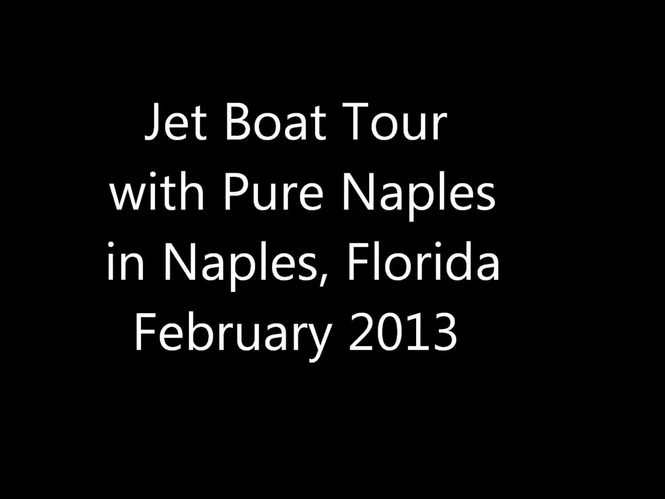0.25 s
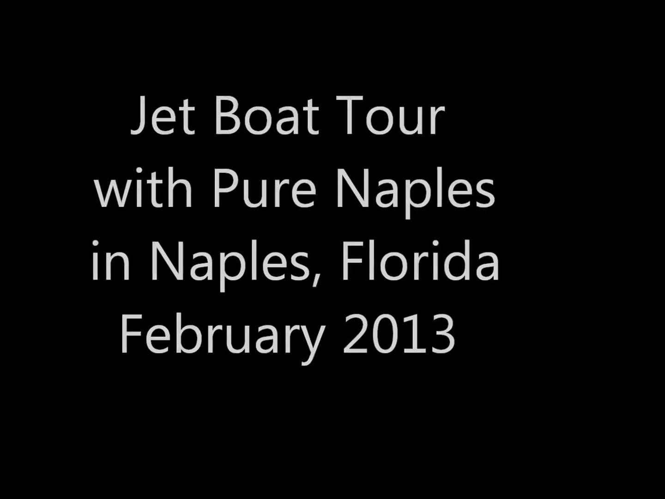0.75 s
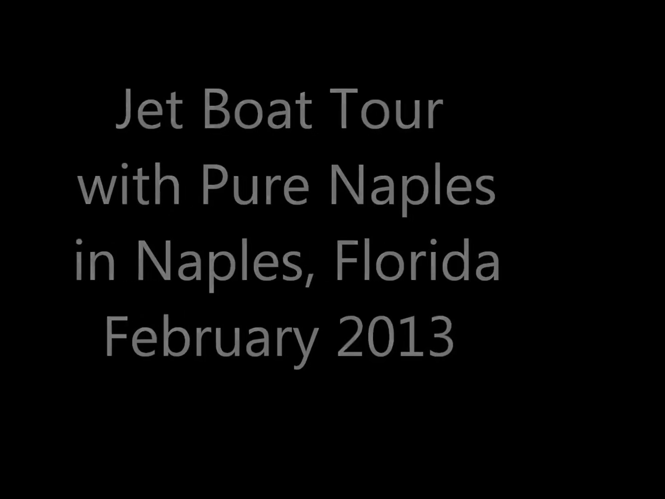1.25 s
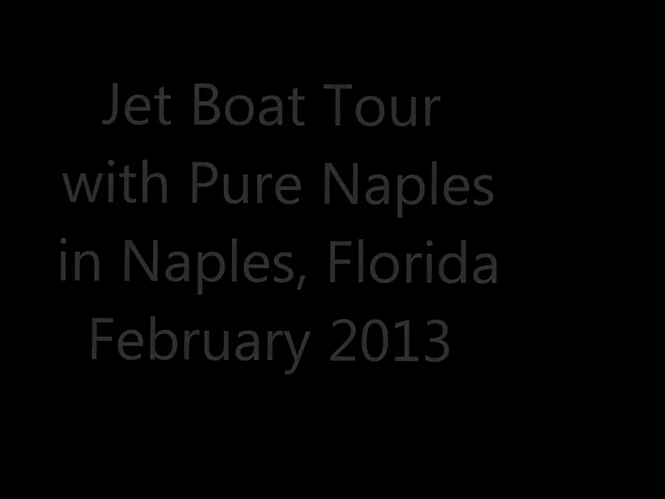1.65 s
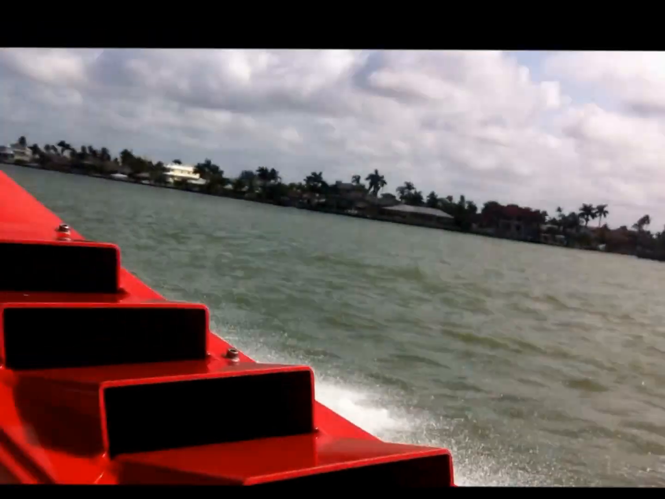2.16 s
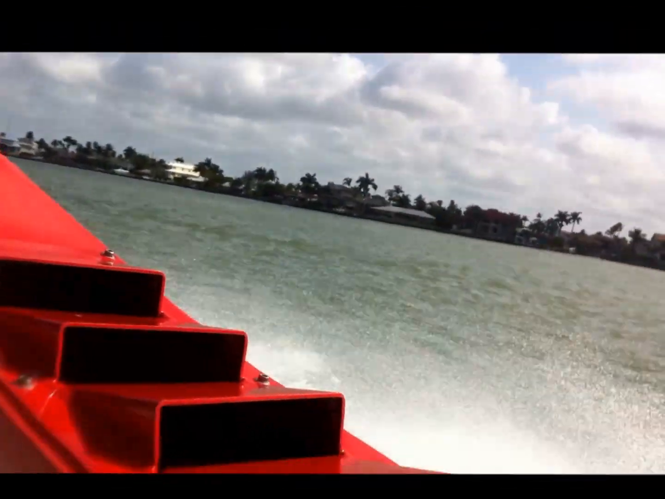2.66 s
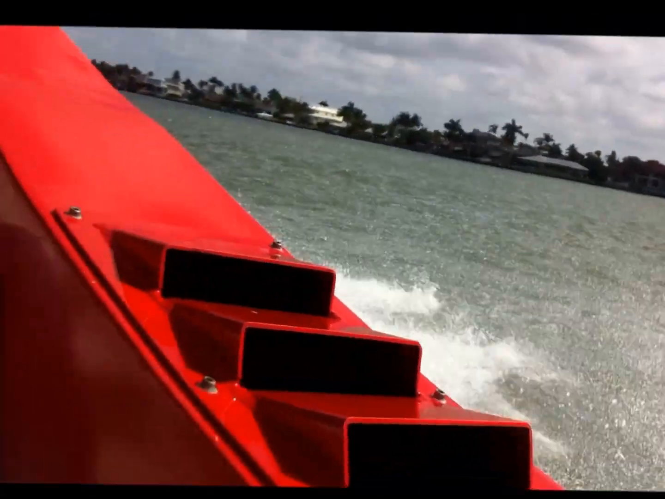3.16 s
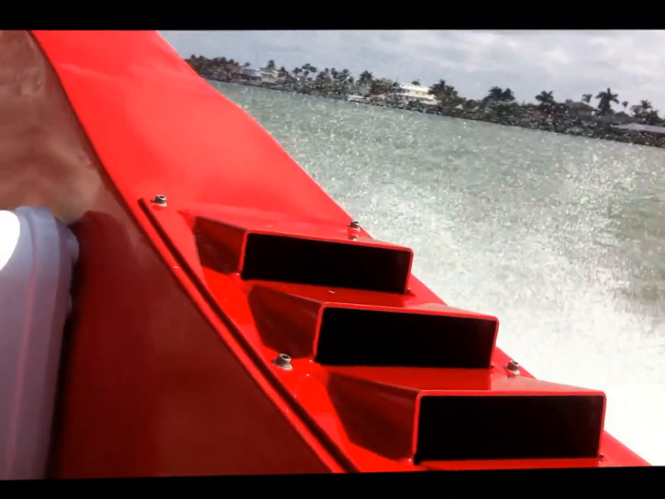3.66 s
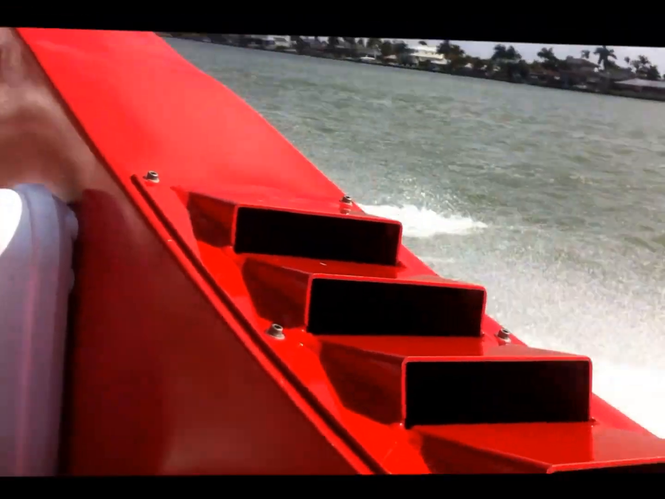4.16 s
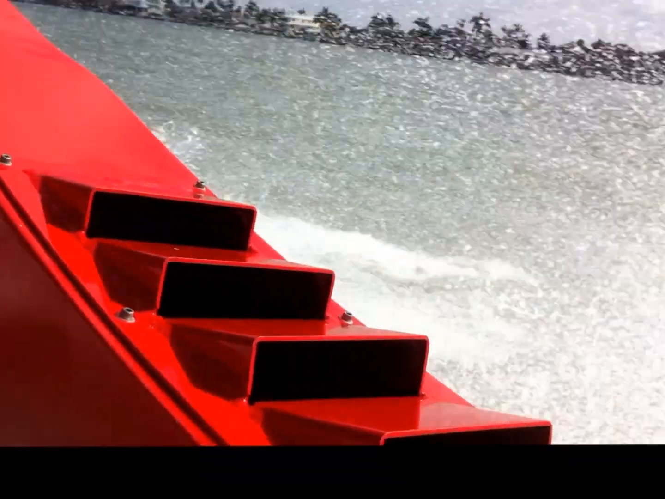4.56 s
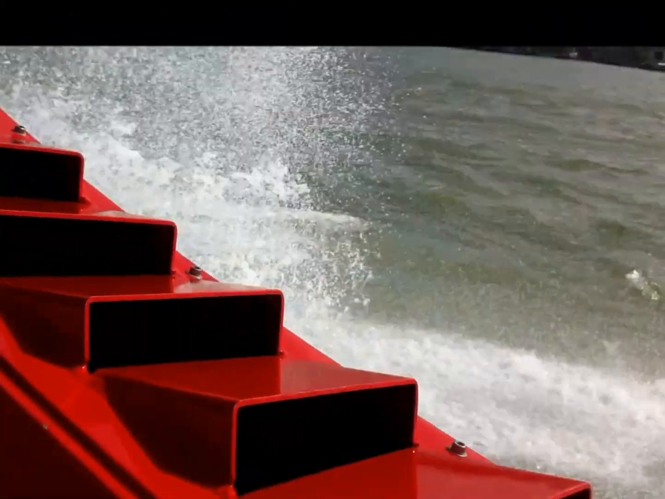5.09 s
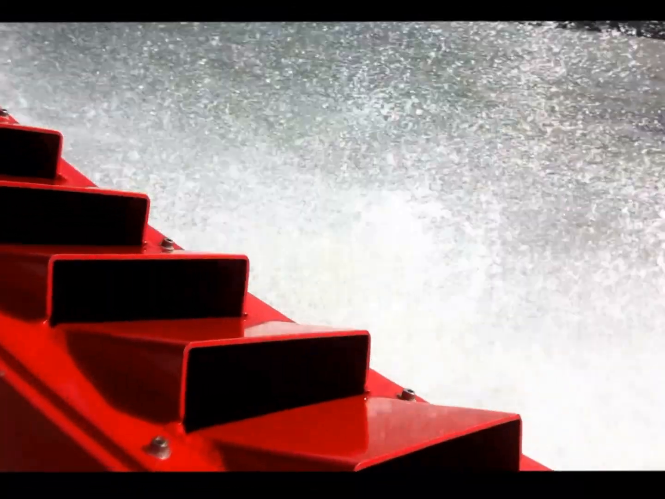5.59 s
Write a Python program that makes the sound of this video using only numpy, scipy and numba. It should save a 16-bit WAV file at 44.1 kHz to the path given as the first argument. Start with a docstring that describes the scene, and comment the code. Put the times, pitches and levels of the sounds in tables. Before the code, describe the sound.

On board a speeding boat over open water, close and dry, the microphone is exposed to the wind. After initial silence, low rumble and ragged gusts dominate, with irregular distorted thumps throughout. Beneath them a tonal engine dips and pulls up again, with buzzing panels and a faint high turbo whistle. Hull water hisses, swells and falls back; the wind ends strongest.

```python
"""On board a jet boat at speed; the sound cuts in after a short silence.
The engine, a harmonic series of exhaust tones over humming panels, eases off and pulls up again.
A turbo whistles thinly as a gliding sine; water rushes along the hull as coloured noise.
Wind roars as patchy noise and thumps on the microphone as filtered impulses; spray drops tick on
it as short noise bursts. A limiter ducks after the hardest peaks."""
import sys
import numpy as np
from scipy import signal
from scipy.fft import rfft, irfft, next_fast_len
from scipy.io import wavfile
from scipy.ndimage import uniform_filter1d
from numba import njit

SR = 44100
rng = np.random.default_rng(int(sys.argv[2]) if len(sys.argv) > 2 else 0)


def bounce(signal):
    """Save signal as a 16-bit WAV file at the path given by the first command-line argument."""
    frames = np.transpose(np.atleast_2d(signal))
    limited = np.clip(frames, -1, 1)
    pcm = np.round(limited * 32767).astype(np.int16)
    wavfile.write(sys.argv[1], SR, pcm)


N = 257103


def undb(db):
    """Decibel law: 20 dB is a factor of ten in amplitude."""
    return 10 ** (np.asarray(db) / 20)


def curves(table):
    """Linear interpolation: each column of a timed table becomes a curve, sample by sample."""
    s, *columns = np.transpose(table)
    return [np.interp(np.arange(N) / SR, s, column) for column in columns]


def unit(x):
    """Normalisation: scale to a standard deviation of 1."""
    return x / np.std(x)


def walk(rate):
    """Band-limited randomness: held random steps, smoothed into a drift with spread 1."""
    hold = max(int(SR / rate), 1)
    steps = np.repeat(rng.standard_normal(N // hold + 1), hold)
    return unit(uniform_filter1d(steps, hold)[:N])


def colour(x, points):
    """Minimum-phase filtering: a causal filter follows a spectrum of (frequency [Hz], gain [dB])."""
    hz, db = np.transpose(points)
    size = next_fast_len(2 * N)
    size += size % 2
    f = np.maximum(np.arange(size // 2 + 1) * SR / size, 1)
    gain_db = np.interp(np.log(f), np.log(hz), db)
    # folding the cepstrum onto positive times makes the filter causal
    cepstrum = irfft(np.log(undb(gain_db)))
    cepstrum[1:size // 2] *= 2
    cepstrum[size // 2 + 1:] = 0
    response = np.exp(rfft(cepstrum))
    return irfft(rfft(x, size) * response)[:N]


def turbulence(points, rate, patchy_db):
    """Intermittency of turbulence: coloured noise arrives in uneven packets; rms 1."""
    packets = undb(patchy_db * walk(rate))
    return unit(colour(rng.standard_normal(N) * packets, points))


def strikes(times, sizes, points):
    """Impulse response: each sudden push sounds the filter's colour; size 1 peaks at 1."""
    pushes = np.zeros(N)
    places = np.clip((times * SR).astype(int), 0, N - 1)
    np.add.at(pushes, places, sizes)
    peak = np.abs(colour(signal.unit_impulse(N), points)).max()
    return colour(pushes, points) / peak


def scatter(rate, spread_db, points, count=2500):
    """Poisson process: pushes at random moments, most small and a few large; rms 1."""
    chance = rng.random((count, 3))
    times = np.cumsum(-np.log(1 - chance[:, 0])) / rate
    sizes_db = -spread_db * np.log(1 - .95 * chance[:, 1])
    signs = np.sign(chance[:, 2] - .5)
    inside = times < N / SR
    return unit(strikes(times[inside], (undb(sizes_db) * signs)[inside], points))


# engine speed and loudness: (time [s], firing rate [Hz], level [dB])
ENGINE_RUN = [(.6, 316, -19), (.95, 306.5, -19), (1.65, 303, -21), (2.1, 313, -22), (2.6, 317, -28),
              (4, 332, -27), (4.6, 337, -19.5), (5.4, 341, -18.5), (5.83, 347, -23)]
# exhaust tones, four firings a turn: (multiple of the crank rate, relative level [dB])
EXHAUST_ORDERS = [(2, -30), (2.5, -21), (3, -18), (3.5, -11), (4, 5.5), (5, -5.5), (6, -21), (7, -10),
                  (9, -18)]
# hull panels that hum for a while:
# (resonance [Hz], width of one filter pass [Hz], level [dB], start [s], end [s])
HULL_PANELS = [(185, 45, -20, 3.2, 4.5), (405, 60, -22, .5, 3.2), (505, 70, -22.5, .5, 3.2),
               (740, 90, -27, 3.2, 6), (1070, 130, -34, .5, 3.3), (1620, 180, -43, 2.3, 3.1),
               (2100, 130, -42, 2.4, 5.1), (2660, 130, -44, .9, 1.9), (3350, 240, -49, 2.2, 3.8)]


def engine():
    """Harmonic series and resonance: tones on the crank's multiples; the firings set hull panels humming."""
    firing_hz, level_db = curves(ENGINE_RUN)
    unsteady_hz = firing_hz * (1 + .002 * walk(30))
    phase = 2 * np.pi * np.cumsum(unsteady_hz) / SR
    crank = phase / 4
    tones = 0
    for order, order_db in EXHAUST_ORDERS:
        gain = undb(order_db + 1.53 * walk(15))
        tones = tones + gain * np.sin(order * crank + 2 * np.pi * rng.random())
    # noise pulsing at the firing rate drives the panels
    puffs = rng.standard_normal(N) * (1 + .5 * np.cos(phase))
    panels = 0
    for hz, width, panel_db, start, end in HULL_PANELS:
        b, a = signal.iirpeak(hz, hz / width, fs=SR)
        once = signal.lfilter(b, a, puffs)
        ring = unit(signal.lfilter(b, a, once))
        fade_db, = curves([(start - .3, -10), (start + .1, 0), (end - .1, 0), (end + .3, -10)])
        panels = panels + ring * undb(panel_db + fade_db)
    return undb(level_db) * unit(tones) + panels


# the turbo spins down and up again after the engine: (time [s], whistle [Hz], level [dB])
TURBO_RUN = [(.65, 8580, -49), (.85, 8300, -63), (1.08, 8070, -64), (1.25, 7950, -72), (2, 7900, -72),
             (2.3, 8110, -57), (3.1, 8590, -50), (4.4, 9130, -55), (5.83, 9710, -54)]


def turbo():
    """Frequency and amplitude modulation: a thin whistle flutters as the wind tears at it."""
    whistle_hz, level_db = curves(TURBO_RUN)
    unsteady_hz = whistle_hz * (1 + .0045 * walk(400))
    phase = 2 * np.pi * np.cumsum(unsteady_hz) / SR
    flutter = undb(3.5 * walk(45) + 2.5 * walk(9))
    return undb(level_db) * unit(np.sin(phase) * flutter)


# eddies bursting on the microphone, each with a sharp click of the overloaded microphone:
# (time [s], thump [dB], click [dB])
BURSTS = [(0.7982, -3, -8), (0.8585, -2.5, -11), (0.894, 0.5, -12), (0.8976, -3, -6), (1.0803, -4.5, -22),
          (1.1228, 0, -19), (1.1741, -1.5, -23), (1.1974, -3.5, -22), (1.2166, -4.5, -12),
          (1.2808, -3.5, -3.5), (1.4139, 0, -4.5), (1.5354, -1.5, -15), (1.5736, -6, -24), (1.669, -4, -11),
          (1.7496, 2, -6.5), (1.8699, -0.5, -3.5), (2.0047, -1, -13), (2.0758, -1.5, -12),
          (2.1078, 0.5, -9), (2.1298, -2, -14), (2.139, -1.5, -8), (2.2032, -1.5, -13), (2.248, -1, -8),
          (2.492, -1.5, -19), (2.53, 1, -12), (2.6425, 1, -17), (2.9153, 1, -18), (3.0469, 0.5, -18),
          (3.2331, 4, -11), (3.479, -1, -17), (3.5398, -1.5, -17), (3.5717, 3, -7), (3.692, 0.5, -17),
          (3.8183, 0.5, -15), (4.0277, -0.5, -10.5), (4.1233, -3, -20), (4.157, 0, -5), (4.2196, 1.5, -12),
          (4.337, 1.5, -2), (4.3582, 0, -2.5), (4.3695, -1, -10), (4.5407, 0, -17), (4.6317, 1.5, -2),
          (4.6596, -4, -4), (4.8623, -3, -16), (4.9587, -1.5, -2), (5.056, -0.5, -19), (5.116, -1, -10),
          (5.1434, -4.5, -9), (5.1864, -4, -8), (5.3435, -3, -12), (5.4788, 2, -7), (5.789, 0.5, -1)]
# colour of the thumps: (frequency [Hz], relative level [dB])
THUMP_COLOUR = [(20, -35), (70, -23), (160, -0.5), (450, 3.5), (800, 0.5), (1300, -4), (1900, -13),
                (3200, -18), (5000, -42.5), (16000, -67)]
# colour of the overload clicks: (frequency [Hz], relative level [dB])
CLICK_COLOUR = [(400, 3), (1500, 3.5), (3000, 4.5), (5000, -4), (8000, -10), (12000, -19), (16000, -30)]
# the diaphragm swings back after a thump: typical delay, spread of the delay, strength
REBOUND_S, REBOUND_SPREAD_DB, REBOUND_DB = .0007, 1.8, -1.5
# smaller eddies trail each burst: number, typical spacing, level change from one to the next
TRAIL_COUNT, TRAIL_GAP_S, TRAIL_DB = 2, .016, -7.5


def thumps():
    """Impulsive pressure: a bursting eddy slams the diaphragm, which swings back; the overload clicks."""
    s, thump_db, click_db = np.transpose(BURSTS)
    out = 0
    for k in range(TRAIL_COUNT + 1):
        gap, swing = rng.standard_normal((len(s), 2)).T
        rebound_s = s + REBOUND_S * undb(REBOUND_SPREAD_DB * swing)
        push, pull = undb(thump_db), -undb(thump_db + REBOUND_DB)
        body = strikes(np.r_[s, rebound_s], np.r_[push, pull], THUMP_COLOUR)
        click = strikes(s, undb(click_db), CLICK_COLOUR)
        out = out + undb(k * TRAIL_DB) * (body + click)
        s = s + TRAIL_GAP_S * np.exp(.5 * gap)
    return out


# slow gusts, before buffeting, swells and level dips:
# (time [s], deep rumble [dB], roar of the small eddies [dB])
GUSTS = [(0.65, -16.5, -14), (1.15, -13, -13.5), (1.45, -18.5, -16), (1.68, -15, -13.5), (2.12, -14, -15),
         (2.3, -18.5, -15.5), (2.58, -17, -11.5), (2.8, -17, -14), (3.25, -12, -13.4), (3.55, -17, -15),
         (3.72, -12, -13), (4.25, -13.5, -12.5), (4.48, -12, -14), (4.75, -15, -12.5), (5.3, -12.5, -13.5),
         (5.5, -11.0, -11), (5.83, -9, -10.5)]
# brief dips in level, some where the limiter ducks after a hard thump: (time [s], depth [dB])
LEVEL_DIPS = [(.745, -4.5), (.985, -5), (2.23, -4), (2.69, -6.5), (2.86, -5), (3.595, -8)]
# colours of the rumble, the roar and the sputter: (frequency [Hz], relative level [dB])
RUMBLE_COLOUR = [(20, -39), (50, -29), (80, -15), (105, -5.5), (135, 0), (190, 0.5), (260, -6.5),
                 (400, -19.5), (900, -37.5), (3000, -84)]
ROAR_COLOUR = [(60, -44), (150, -7), (270, 3), (400, -1), (520, -1.5), (640, -9), (800, -14.5),
               (1200, -23.5), (2000, -27.5), (4000, -58.5), (16000, -56.5)]
SPUTTER_COLOUR = [(20, -35.5), (70, -12), (160, 0.5), (450, 2), (800, -4), (1300, -17), (2000, -26),
                  (3200, -27.5), (5000, -47.5), (16000, -81)]
# quick buffeting within a gust: spread of each level, changes per second
RUMBLE_BUFFET_DB, ROAR_BUFFET_DB, BUFFET_PER_S = 1.5, 1.0, 16
SPUTTER_DB, CRACKLE_DB = -4, -27  # relative to the roar
# the roar swells around each bursting eddy: height, time to fall to 1/e of it
SWELL_DB, SWELL_S = 1.5, 0.013
DIP_S = 0.018  # half-width of a dip at 1/e of its depth


def wind():
    """Turbulence spectrum: large eddies rumble, small ones roar and sputter; the level swells and dips."""
    rumble_db, roar_db = curves(GUSTS)
    t = np.arange(N) / SR
    nearness = np.max([np.exp(-np.abs(t - s) / SWELL_S) for s, _, _ in BURSTS], axis=0)
    dip_db = sum(db * np.exp(-((t - s) / DIP_S) ** 2) for s, db in LEVEL_DIPS)
    buffet = walk(BUFFET_PER_S)
    rumble_db = rumble_db + dip_db + RUMBLE_BUFFET_DB * buffet
    roar_db = roar_db + dip_db + ROAR_BUFFET_DB * buffet + SWELL_DB * nearness
    rumble = undb(rumble_db) * turbulence(RUMBLE_COLOUR, rate=35, patchy_db=0.5)
    roar = turbulence(ROAR_COLOUR, rate=160, patchy_db=3.0)
    sputter = undb(SPUTTER_DB) * scatter(rate=240, spread_db=4.5, points=SPUTTER_COLOUR)
    # faint random clicks of the same colour as those of the thumps
    crackle = undb(CRACKLE_DB) * scatter(rate=50, spread_db=6.5, points=CLICK_COLOUR)
    return rumble + undb(roar_db) * (roar + sputter + crackle)


# spray drops striking the housing: (time [s], relative strength [dB])
SPRAY_DROPS = [(0.7925, -10), (1.8463, -4), (1.925, -24), (2.5122, -8.5), (2.886, -16), (2.9895, -8),
               (3.1288, -7), (3.4036, -10), (3.9002, -12), (4.3348, -18), (4.4303, -16), (4.805, -15),
               (5.563, -17)]
# colour of a drop's strike: (frequency [Hz], gain [dB])
DROP_COLOUR = [(300, -12), (1500, -7), (3000, -4), (4500, -4), (7500, 0), (11000, -1), (16000, -6)]
# a splatter peaks this long after the drop lands; its level relative to the drop's strength
SPLAT_S, SPLAT_DB = 0.00058, -7.5


def drops():
    """Transient excitation: each drop is a noise burst that rises at once and dies within milliseconds."""
    splats = np.zeros(N)
    for s, strength_db in SPRAY_DROPS:
        age = np.maximum(np.arange(N) / SR - s, 0) / SPLAT_S
        splats += undb(strength_db) * age * np.exp(1 - np.minimum(age, 50))
    return colour(splats * rng.standard_normal(N), DROP_COLOUR) * undb(SPLAT_DB)


# water along the hull, before the surge: (time [s], rush [dB])
HULL_WATER = [(0.65, -36), (1.2, -37), (1.6, -35.5), (2.25, -37.5), (2.8, -35.5), (3.45, -34.5),
              (4.35, -35), (4.75, -33.5), (5.83, -35)]
# colours of the rush and of the fine spray: (frequency [Hz], relative level [dB])
RUSH_COLOUR = [(200, -26), (500, 6.5), (950, 2), (1280, -6), (1500, 4), (1850, -5), (2300, 3), (2800, -0.5),
               (3400, -5.5), (4100, -17), (6000, -15), (8000, -31), (16000, -44)]
SPRAY_COLOUR = [(2000, 0), (4200, 6.5), (5000, 7), (6200, 3), (6900, 0.5), (9500, 0.5), (11000, -3),
                (13000, -7), (14500, -11), (16000, -31)]
SPRAY_DB, PATTER_DB = -10.5, -59  # spray relative to the rush; level of the pattering droplets
# the bow cuts through a wave: the rush builds to a crest, then collapses
SURGE_CREST_S, SURGE_DB = 2.6, 7
SURGE_RISE_S, SURGE_FALL_S = .22, .05


def water():
    """Flow noise: the bow wave rushes and surges once, spray hisses in step with it, and droplets patter."""
    rush_db, = curves(HULL_WATER)
    past = np.arange(N) / SR - SURGE_CREST_S
    width_s = np.where(past < 0, SURGE_RISE_S, SURGE_FALL_S)
    rush_db = rush_db + SURGE_DB * np.exp(-(past / width_s) ** 2)
    rush = turbulence(RUSH_COLOUR, rate=60, patchy_db=1.2)
    spray = turbulence(SPRAY_COLOUR, rate=30, patchy_db=2.2)
    patter = scatter(rate=25, spread_db=6, points=DROP_COLOUR)
    return undb(rush_db) * (rush + undb(SPRAY_DB) * spray) + undb(PATTER_DB) * patter


def scene():
    """Superposition: all signals add at the one microphone."""
    return (engine() + turbo() + thumps() + wind() + drops() + water())[None]


@njit
def follow(size, release):
    """Peak detection: the held level jumps up at once and sinks exponentially."""
    out, held = np.empty(len(size)), 0.
    for i in range(len(size)):
        held = max(size[i], held * release)
        out[i] = held
    return out


START_S, TOP_HZ = 0.626, 15800  # the sound switches on; upper band limit


def record(dry, ceiling_db=-0.32, release_s=0.091, attack_s=0.0039):
    """Saturation and gain control: the microphone overloads, a limiter ducks after peaks, the top is cut."""
    switch_on = np.clip((np.arange(N) / SR - START_S) / 0.0041, 0, 1)
    x = dry[0] * switch_on
    x = x / (1 + (x / 1.7) ** 6) ** (1 / 6)  # soft overload
    held = follow(np.abs(x), np.exp(-1 / (release_s * SR)))
    wanted_duck = 1 - np.minimum(1, undb(ceiling_db) / (held + 1e-9))
    lag = np.exp(-1 / (attack_s * SR))
    duck = signal.lfilter([1 - lag], [1, -lag], wanted_duck)
    # what gets past the limiter's attack is clipped
    x = np.clip(x * (1 - duck), -1, 1)
    low_pass = signal.ellip(8, .2, 70, TOP_HZ, fs=SR, output="sos")
    return signal.sosfilt(low_pass, x)[None]


dry = scene()
out = record(dry)
bounce(out)
```